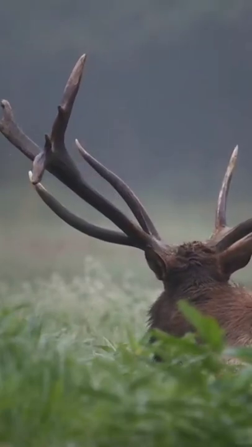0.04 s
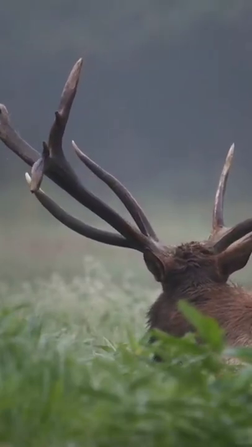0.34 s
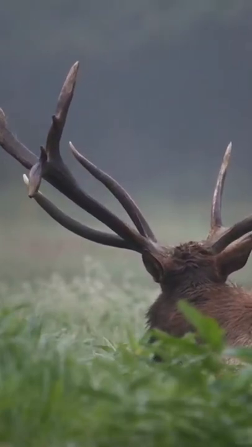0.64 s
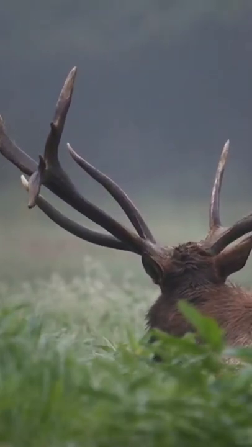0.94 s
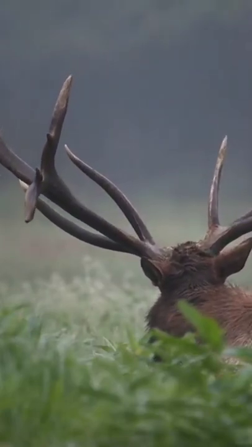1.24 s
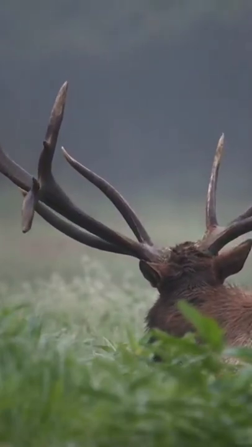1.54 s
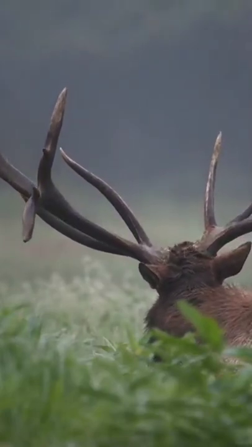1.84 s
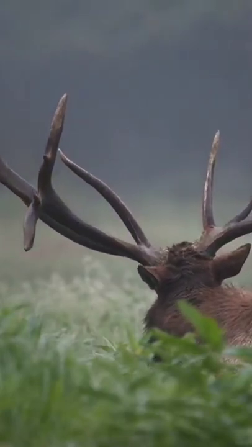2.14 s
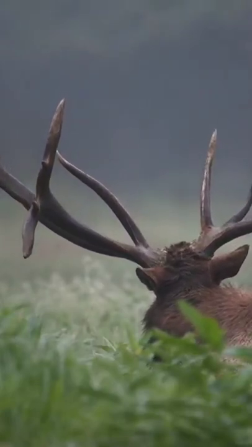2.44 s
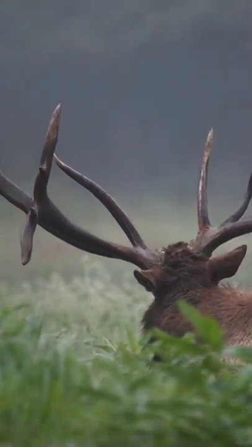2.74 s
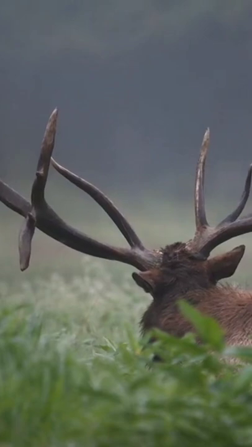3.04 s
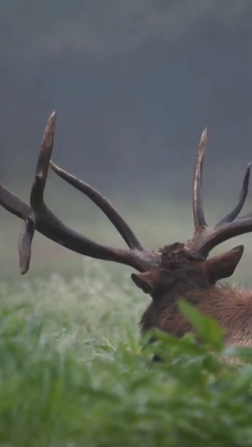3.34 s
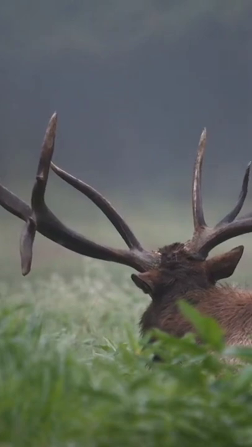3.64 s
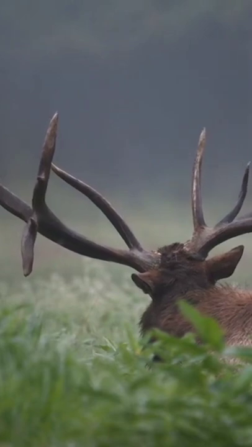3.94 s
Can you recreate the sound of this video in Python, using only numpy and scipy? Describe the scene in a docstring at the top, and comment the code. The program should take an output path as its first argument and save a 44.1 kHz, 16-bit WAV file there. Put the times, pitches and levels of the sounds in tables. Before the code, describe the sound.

A distant elk's whistling bugle echoes through a valley, following a woodpecker's quick calls.

```python
"""Elk and woodpecker in a misty valley

A woodpecker gives a run of calls that each rise and fall. Then a distant elk bugles: a whistle that
steps up through two notes and holds a third. The trees echo both, the bugle late and strongly.
Plants rustle nearby with tiny cracks, small birds chip, and insects hiss over a low hum,
a few low bumps and soft air."""
import sys
import numpy as np
from scipy import signal
from scipy.fft import rfft, irfft
from scipy.io import wavfile
from scipy.ndimage import uniform_filter1d, map_coordinates

SR = 44100
rng = np.random.default_rng(int(sys.argv[2]) if len(sys.argv) > 2 else 0)


def output_pcm(signal):
    """Save a mono or channel-first signal as 16-bit PCM at the path in sys.argv[1].

    Samples are clipped to [-1, 1] before scaling.
    """
    pcm = np.clip(np.atleast_2d(signal).T, -1, 1) * 32767
    wavfile.write(sys.argv[1], SR, np.round(pcm).astype(np.int16))


N = 176400
T = np.arange(N) / SR
FREQS_HZ = np.arange(N // 2 + 1) * SR / N


def gain(db):
    """Turn decibels into a number to multiply by."""
    return 10 ** (np.asarray(db) / 20)


def unit(x):
    """Scale a sound to an average strength (rms) of 1."""
    return x / np.sqrt(np.mean(x ** 2))


def wobble(per_second):
    """A smooth random curve that strays about 1 either side of zero."""
    return map_coordinates(rng.standard_normal(8192), [T * per_second + 2], order=3, mode="wrap")


def ring(x, hz, width_hz):
    """Pass a sound twice through a resonance, which favours one pitch; the result has strength 1."""
    f = FREQS_HZ + 1e-6
    return unit(irfft(rfft(x) / (1 + 1j * (f * f - hz * hz) / (f * width_hz)) ** 2, N))


def tone(hz):
    """A pure tone of strength 1 that follows a changing pitch."""
    return np.sqrt(2) * np.sin(2 * np.pi * np.cumsum(hz) / SR)


def echo(x, fade_s, build_s):
    """Sound scatters off many trunks: it builds up, then fades by 60 dB in fade_s."""
    tail = rng.standard_normal(N) * np.exp(-np.log(1000) * T / fade_s) * (1 - np.exp(-T / build_s))
    return signal.fftconvolve(x, tail / np.sqrt(np.sum(tail ** 2)))[:N]


def forest(x, near_db, far_db):
    """A quick echo from near trees and a long one from the whole valley."""
    near = echo(x, fade_s=0.073, build_s=0.005)
    far = echo(x, fade_s=1.02, build_s=0.015)
    return gain(near_db) * near + gain(far_db) * far


# The tone colour of still air. Each row: frequency in Hz, relative level in dB.
AIR_COLOUR = [(25, -19.5), (60, -4), (95, 1), (135, -8), (300, -9.5), (550, -8.5), (760, -5.5), (1000, -11),
              (1400, -13.5), (1900, -20.5), (2700, -21.5), (3300, -25.5), (5500, -25), (7500, -27),
              (9500, -25), (11500, -30.5), (13500, -23), (15500, -32.5)]
def air():
    """The valley's still air is a soft noise, strongest in the bass."""
    hz, db = np.array(AIR_COLOUR).T
    colour = gain(np.interp(np.log(FREQS_HZ + 1), np.log(hz), db))
    noise = unit(irfft(rfft(rng.standard_normal(N)) * colour, N))
    return noise * gain(-53.5 + .4 * wobble(5))


# The tones of the hum. Each row: pitch in Hz, level in dB.
HUM_TONES = [(95, -59), (190, -76.5), (285, -73), (364, -72)]
def far_hum():
    """A few low tones waver in level and pitch, far away."""
    return sum(gain(db + 0.51 * wobble(10)) * tone(hz * (1 + 0.01167 * wobble(12)))
               for hz, db in HUM_TONES)


# Low bumps. Each row: time of the peak in seconds, fade time in seconds, pitch in Hz, level in dB.
LOW_BUMPS = [(0.165, 0.037, 52, -52.5), (1.305, 0.022, 47, -53), (1.45, 0.035, 370, -53),
             (1.734, 0.058, 65, -54.5), (1.877, .06, 47.2, -59), (2.296, .03, 266, -54.5),
             (3.643, 0.019, 73.74, -51), (3.712, 0.045, 116, -46.5), (3.99, .017, 55, -36)]
def bumps():
    """Bumps of air and handling: each is an unsteady low tone that swells and fades."""
    out = np.zeros(N)
    for peak, fade, hz, db in LOW_BUMPS:
        swell = np.exp(-((T - peak) / fade) ** 2)
        out += gain(db) * swell * tone(hz * (1 + 0.1223 * wobble(80)))
    return out


def insects(hz=3861, level_db=-57.5):
    """A far chorus blends into a narrow, flickering hiss."""
    hiss = ring(rng.standard_normal(N), hz, width_hz=1480)
    chorus = ring(hiss, hz, width_hz=1221)
    return chorus * gain(level_db + 1.25 * wobble(29.97) + .5 * wobble(2.64))


# Small birds' chips. Each row: start in seconds, length in seconds, starting pitch in Hz, level in dB.
BIRD_CHIPS = [(.05, 0.026, 4210, -59), (.15, 0.033, 4190, -57), (.345, 0.019, 4360, -58),
              (.39, 0.016, 4200, -53), (.425, 0.023, 4370, -54), (.49, 0.049, 4300, -51),
              (0.524, 0.0222, 4510, -50.5), (.535, 0.0384, 4306, -49.5), (0.577, 0.038, 5130, -61),
              (.68, .05, 4730, -58.5), (1.635, 0.033, 4510, -52.5), (1.795, 0.024, 4100, -55),
              (1.885, 0.031, 4150, -55.5), (2.035, 0.027, 4030, -54), (2.125, 0.02, 4200, -53),
              (2.822, 0.018, 4550, -50.5), (3.745, 0.022, 4225, -48)]
def small_birds(pitch_fall=0.0764):
    """Short falling chips echo from far off in the trees."""
    chips = np.zeros(N)
    waver = 1 + 0.0251 * wobble(700)
    for start, length, hz, db in BIRD_CHIPS:
        progress = np.clip((T - start) / length, 0, 1)
        pitch = hz * (1 - pitch_fall * progress) * waver
        chips += gain(db) * np.sin(np.pi * progress) * tone(pitch)
    return chips + gain(-2.5) * echo(chips, fade_s=0.31, build_s=0.0059)


# Rustles. Each row: time of the peak, rise time and fade time in seconds, stem level in dB,
# treble level in dB.
PLANT_RUSTLES = [(.188, .002, 0.029, -51.5, -74), (.83, .015, .05, -64, -59.5),
                 (1.06, 0.024, 0.06, -50.5, -56.5), (2.40, 0.0028, .01, -62, -61),
                 (2.653, 0.014, 0.013, -50.5, -56), (2.672, 0.01, 0.027, -44, -54.5),
                 (3.432, .005, .02, -52, -59), (3.457, 0.0054, 0.023, -42, -47),
                 (3.48, .008, 0.03, -42.5, -54), (3.563, 0.0013, 0.0037, -51, -65),
                 (3.578, 0.047, 0.099, -52, -89.5), (3.597, 0.0007, .003, -44, -60),
                 (3.767, 0.0022, .015, -55, -67.5), (3.88, .06, .1, -54.5, -63)]
def plants():
    """Crowds of tiny cracks make stems and leaves ring in short bursts."""
    stem, leaf = (3200, 2200), (5220, 3500)  # pitch and width of each resonance, in Hz
    stem_cracks, leaf_cracks = rng.standard_normal((2, N)) * gain(3 * wobble(900))
    stems = ring(ring(stem_cracks, *stem), *stem)
    leaves = ring(ring(leaf_cracks, *leaf), *leaf)
    treble = leaves + gain(-7) * unit(leaf_cracks)  # bare cracks add crispness
    out = np.zeros(N)
    for peak, rise, fade, stem_db, treble_db in PLANT_RUSTLES:
        burst = np.exp(-np.maximum((peak - T) / rise, (T - peak) / fade))
        out += burst * (gain(stem_db) * stems + gain(treble_db) * treble)
    return out


# Woodpecker calls. Each row: start, length and time to the top pitch in seconds, top pitch in Hz,
# base tone level in dB, octave level in dB, change in dB for the octave that reaches us directly.
WOODPECKER_CALLS = [(-.04, 0.076, 0.034, 1194, -59, -39, -5.5),
                    (0.077, 0.076, 0.035, 1199, -54, -40.5, -9.5),
                    (0.201, 0.069, .031, 1191, -55.5, -41.5, 1.5), (.324, 0.067, .031, 1196, -54.5, -41, 2),
                    (.442, 0.069, .034, 1185, -57, -40.5, 0), (0.57, 0.071, 0.037, 1193, -52, -41.5, -0.5),
                    (0.696, 0.067, .03, 1178, -55, -43.5, -2), (.824, 0.07, 0.037, 1175, -55.5, -42, -10),
                    (0.954, 0.0606, .032, 1153, -48.5, -43, -10),
                    (1.082, 0.074, 0.035, 1163, -53.5, -46, -10.5),
                    (1.214, 0.072, 0.034, 1157, -53, -43.5, -6),
                    (1.354, 0.068, 0.023, 1004, -71, -50.5, 3.5)]
def woodpecker(arch_drop=0.15, arch_s=.032, rise_s=.006, fade_s=.03):
    """Each call arches up and down in pitch: a base tone plus its octave, at twice the frequency."""
    to_trees, direct = np.zeros(N), np.zeros(N)
    waver = 1 + 0.0093 * wobble(400)
    for start, length, crest, top_hz, base_db, octave_db, direct_db in WOODPECKER_CALLS:
        age = np.clip(T - start, 0, length)
        from_top = np.abs(age - crest) / arch_s
        hz = top_hz * (1 - arch_drop * from_top ** 1.703) * waver
        swell = np.sin(np.pi * age / length)
        burst = np.minimum(age / rise_s, 1) * np.minimum((length - age) / fade_s, 1)
        base = gain(base_db) * swell * tone(hz)
        octave = gain(octave_db) * burst * tone(2 * hz)
        # The low sides of the arch come back more strongly from the trees.
        sides_db = 6.5 * min(1, crest / arch_s) * (from_top - 0.14)
        to_trees += gain(-5) * base + gain(sides_db) * octave
        direct += base + gain(direct_db) * octave
    return direct + forest(to_trees, near_db=-7, far_db=-6.5)


# Echoes from the forest edges that the elk faces. Each row: delay in seconds, relative level in dB.
EDGE_ECHOES = [(.47, -2.5), (.56, -11), (.665, -3), (.88, -8), (1.0, -10)]
def forest_edges(x):
    """Each edge sends the sound back late, partly clear and partly smeared by the trunks."""
    late = sum(gain(db) * np.interp(T - delay, T, x, left=0) for delay, db in EDGE_ECHOES)
    return gain(-5.5) * late + gain(1) * echo(late, fade_s=1, build_s=0.0064)


def whistle(note, tremble=0.0039, flutter_db=2.0, fade_s=0.036):
    """One note of the bugle: a nearly pure, slightly trembling tone."""
    times, hz, db = np.array(note).T
    fade = np.clip(1 + np.minimum(T - times[0], times[-1] - T) / fade_s, 0, 1)
    loudness = gain(np.interp(T, times, db) + flutter_db * wobble(60))
    pitch = np.interp(T, times, hz) * (1 + tremble * wobble(90))
    return fade * loudness * tone(pitch)


# The bugle's three notes. Each row: time in seconds, pitch in Hz, level in dB.
LOW_NOTE = [(1.92, 800, -68), (1.97, 807, -56), (2.03, 777, -59), (2.08, 787.4, -46.5),
            (2.16, 788.4, -45.5), (2.21, 796, -47.5), (2.25, 799, -46.5), (2.27, 900, -64.5)]
MIDDLE_NOTE = [(2.25, 943, -66), (2.30, 1098, -64), (2.335, 1198, -57), (2.38, 1209, -50.5),
               (2.425, 1225, -47), (2.46, 1237, -66)]
HELD_NOTE = [(2.459, 1476, -62.5), (2.53, 1451, -50.5), (2.561, 1464, -47), (2.68, 1480, -45.5),
             (2.822, 1463, -42), (2.918, 1437, -41), (2.991, 1432, -42), (3.071, 1418, -35),
             (3.199, 1414, -33), (3.402, 1408, -33.5), (3.551, 1396, -31.5), (3.7, 1396, -34),
             (3.8, 1402, -40), (3.88, 1370, -34), (3.939, 1337, -37), (4.0, 1355, -33.5)]
def elk():
    """The bugle steps up to a held note, which sinks and throbs against its own late echoes."""
    low, middle, held = whistle(LOW_NOTE), whistle(MIDDLE_NOTE), whistle(HELD_NOTE)
    # Swirling breath follows the loudness of the held note.
    effort = np.sqrt(np.abs(uniform_filter1d(held ** 2, size=2048)))
    breath = gain(-24.5) * effort * ring(rng.standard_normal(N), hz=1243, width_hz=80)
    direct = low + middle + held + breath
    late = forest_edges(gain(-14) * low + gain(1) * middle + held)
    return direct + forest(direct, near_db=-34.5, far_db=-10) + late


def scene():
    """Everything as heard from the meadow, in one channel."""
    return (woodpecker() + elk() + plants() + small_birds() + insects() + air() + far_hum() + bumps())[None]


def record(dry):
    """A steep filter cuts the treble above 15500 Hz."""
    return signal.sosfilt(signal.ellip(10, .2, 70, 15500, fs=SR, output="sos"), dry)


dry = scene()
out = record(dry)
output_pcm(out)
```